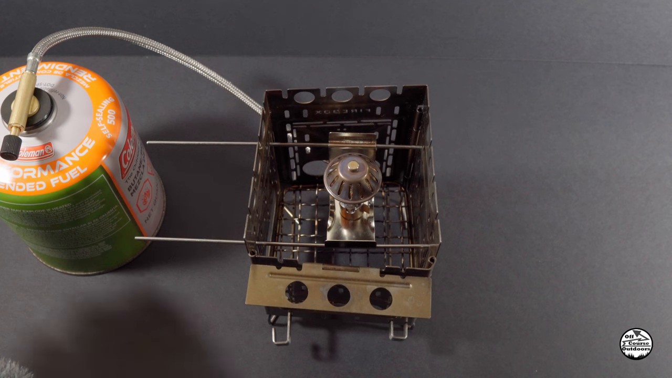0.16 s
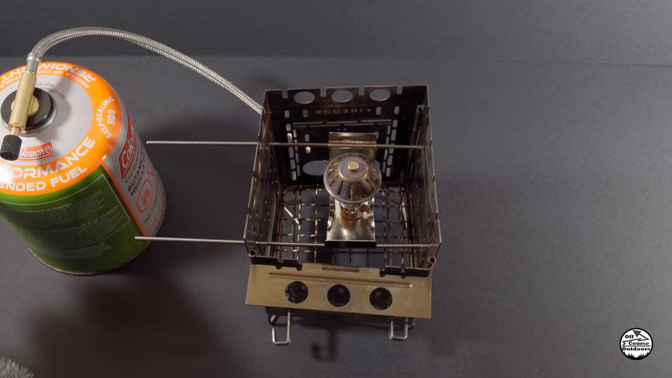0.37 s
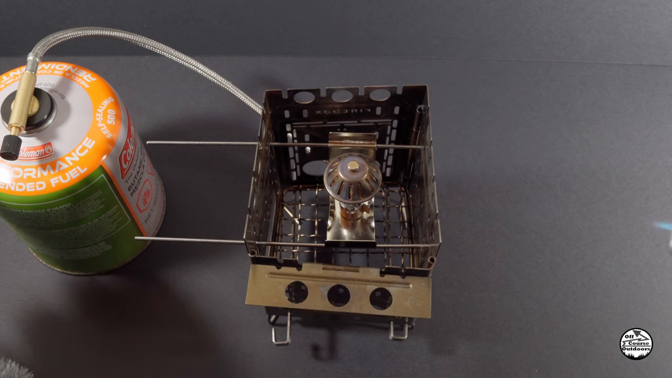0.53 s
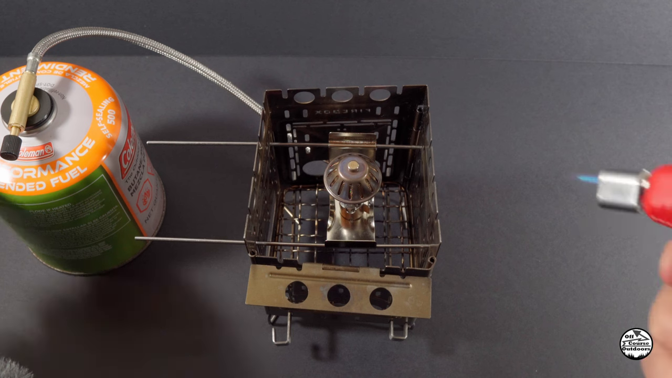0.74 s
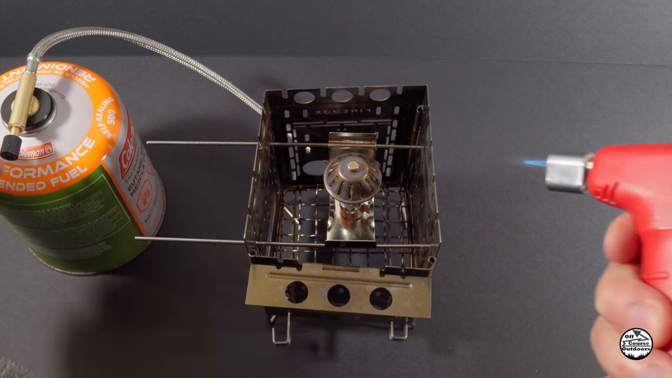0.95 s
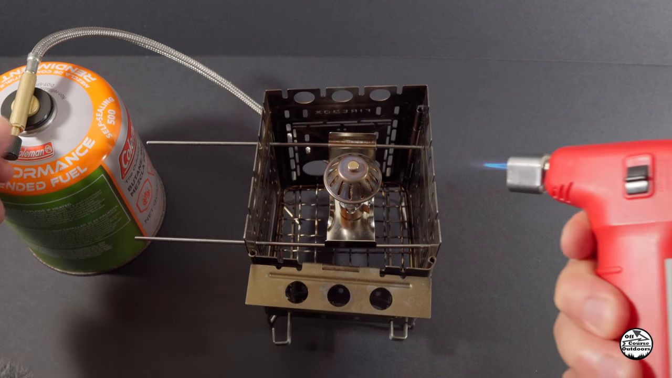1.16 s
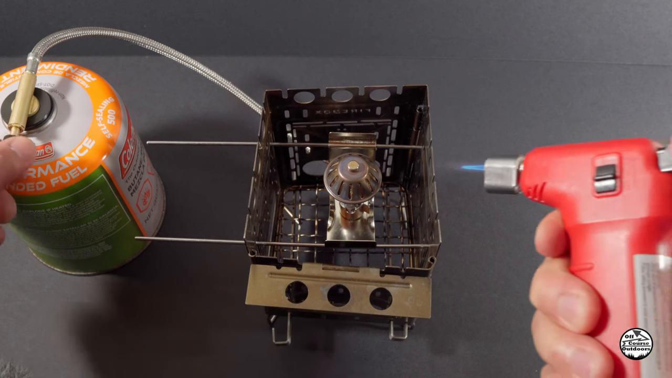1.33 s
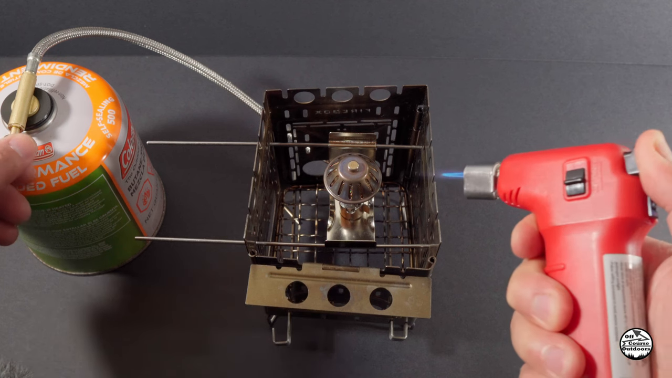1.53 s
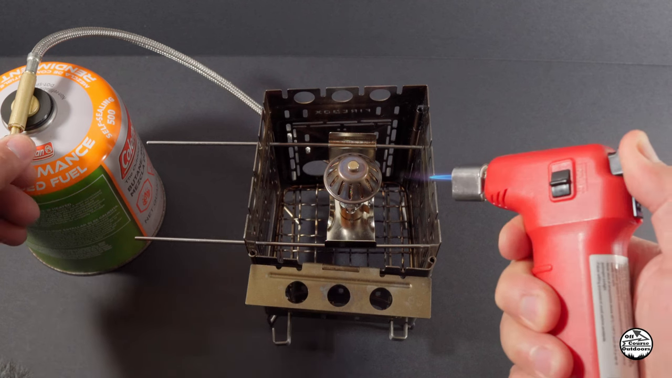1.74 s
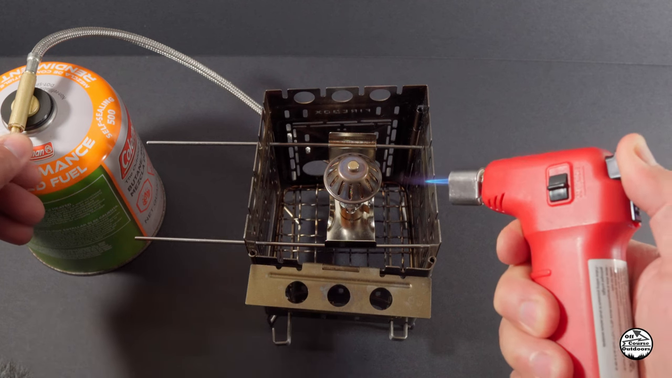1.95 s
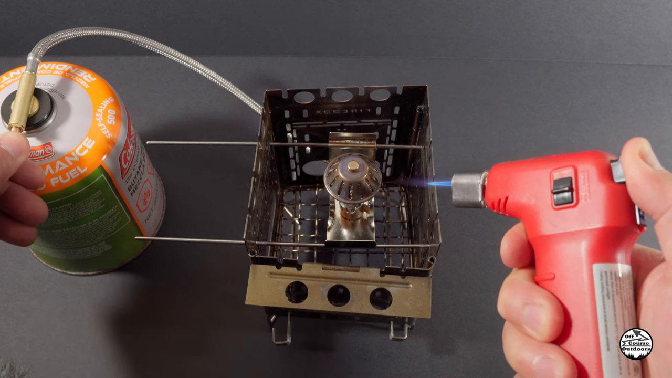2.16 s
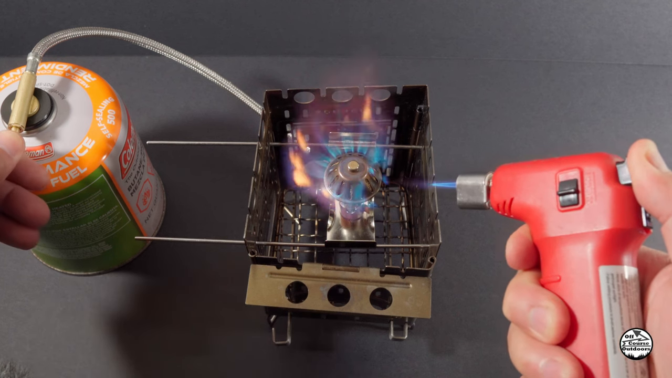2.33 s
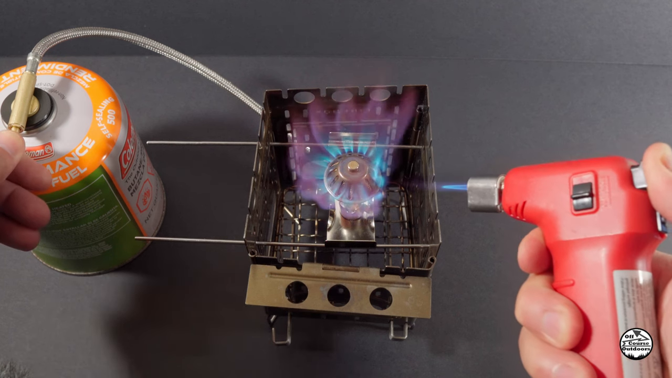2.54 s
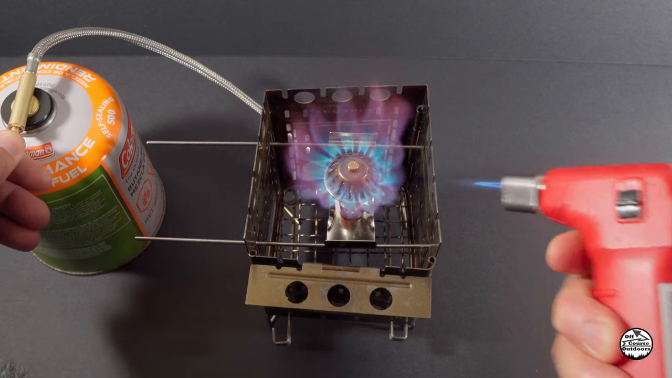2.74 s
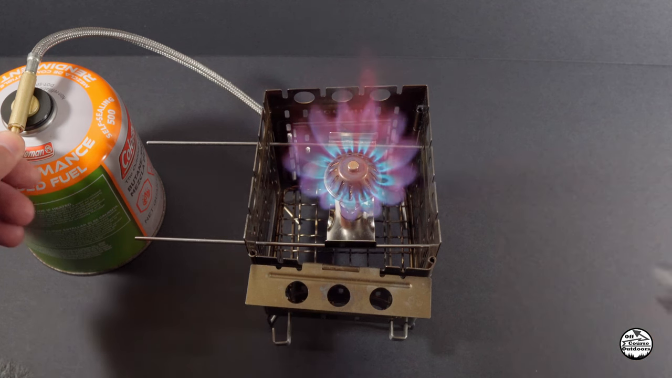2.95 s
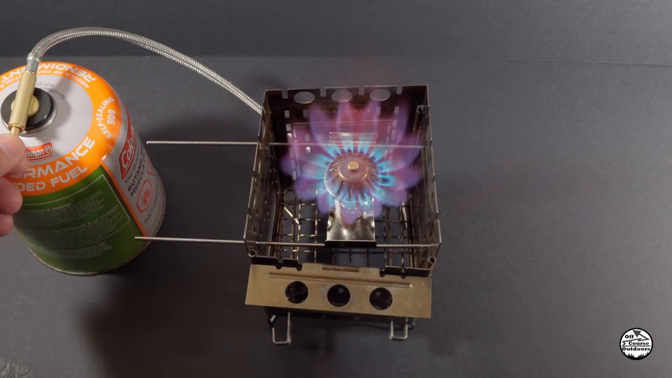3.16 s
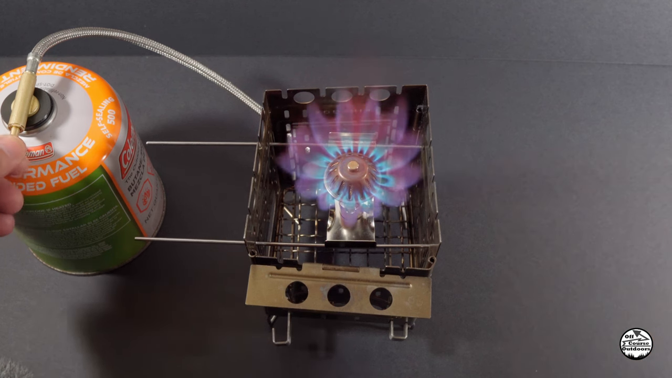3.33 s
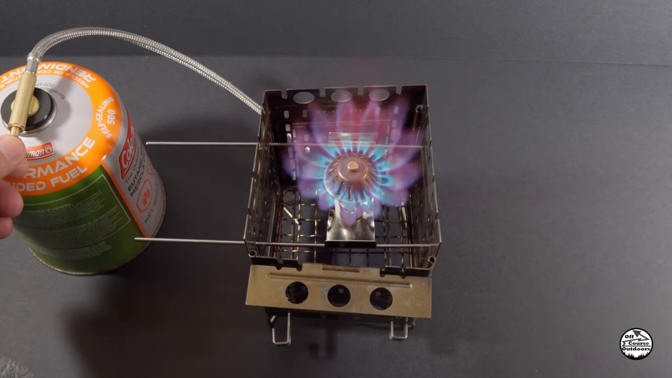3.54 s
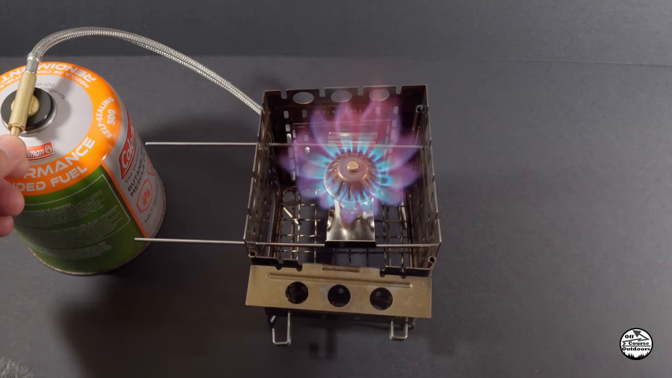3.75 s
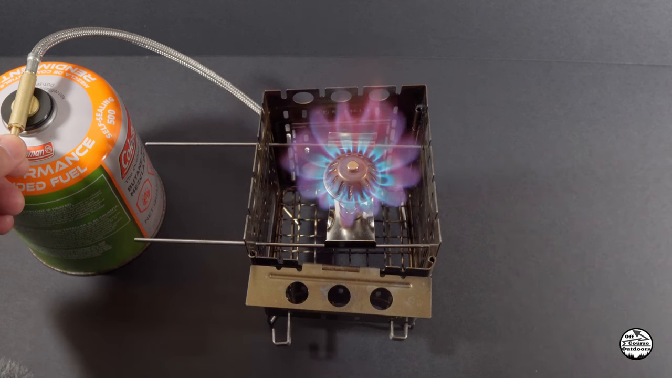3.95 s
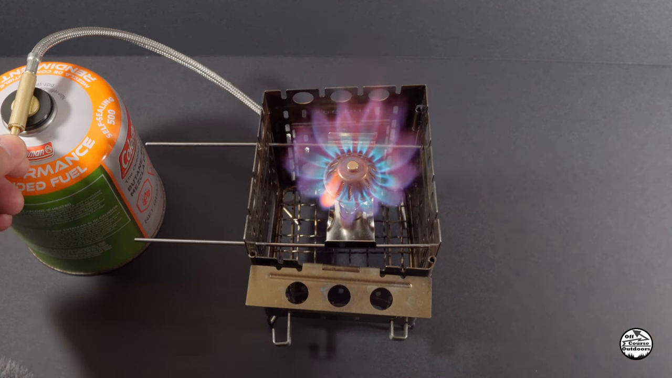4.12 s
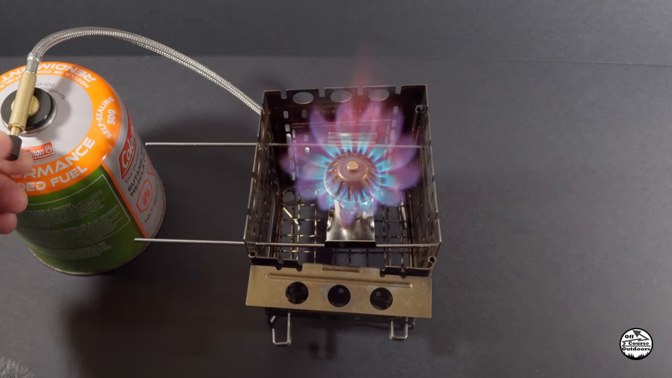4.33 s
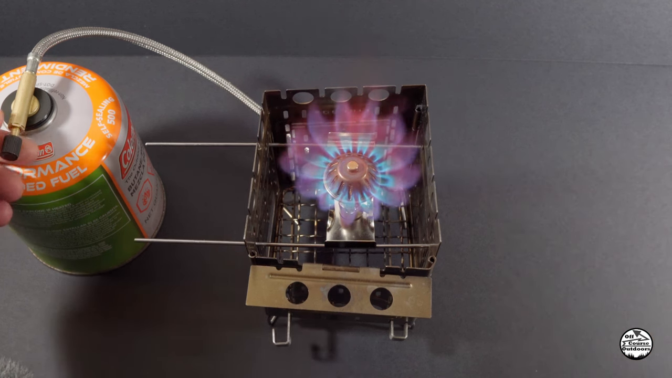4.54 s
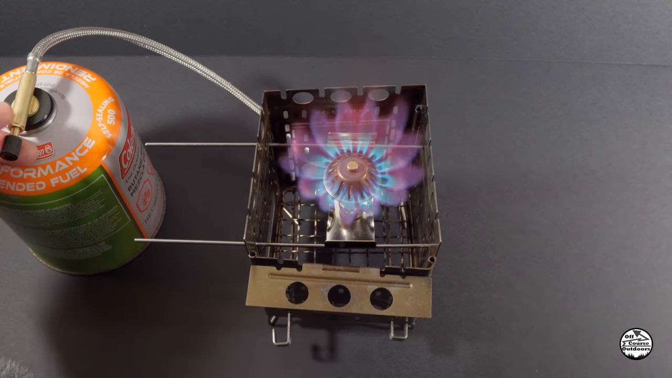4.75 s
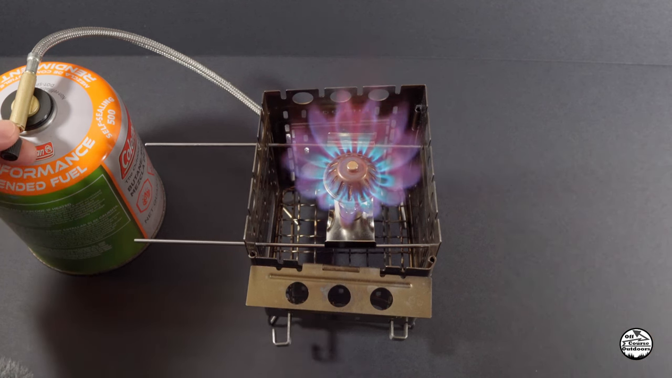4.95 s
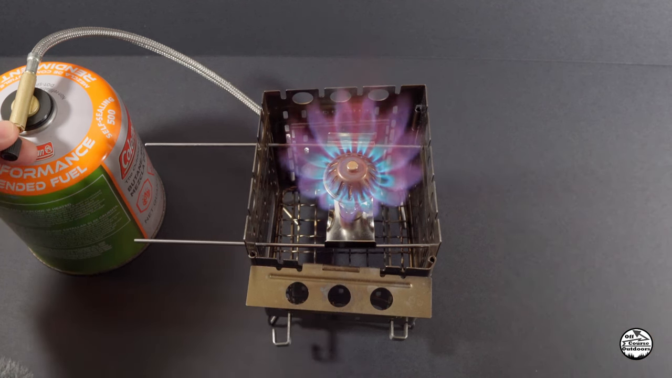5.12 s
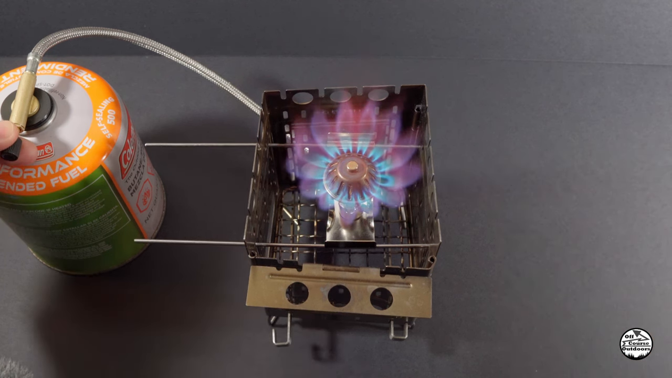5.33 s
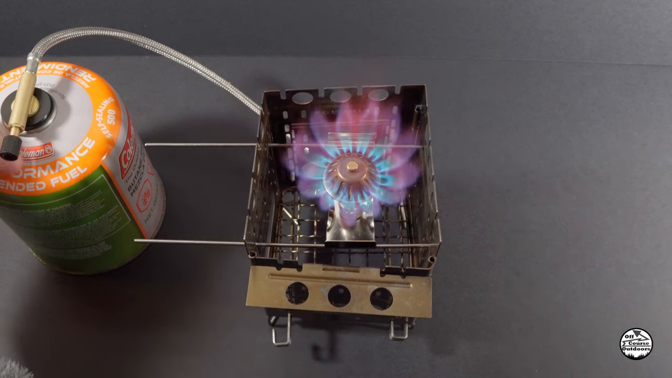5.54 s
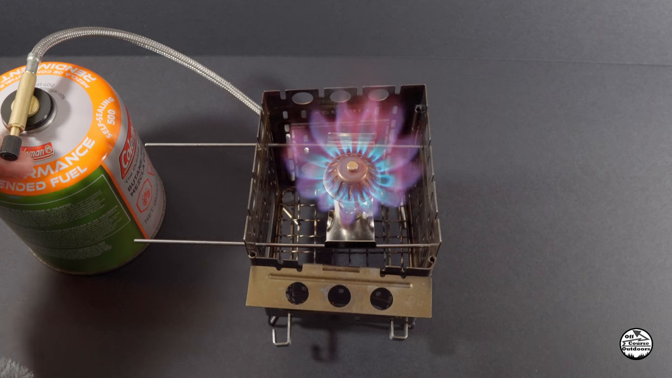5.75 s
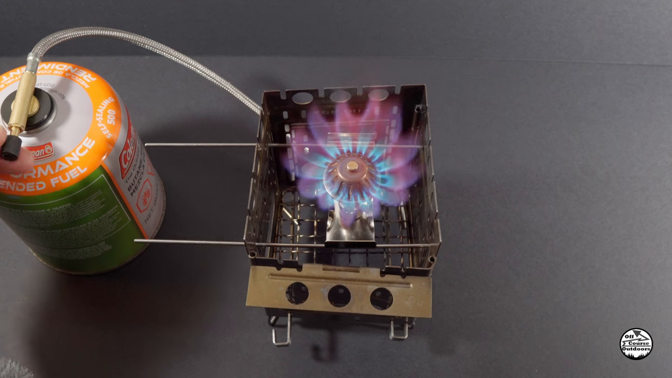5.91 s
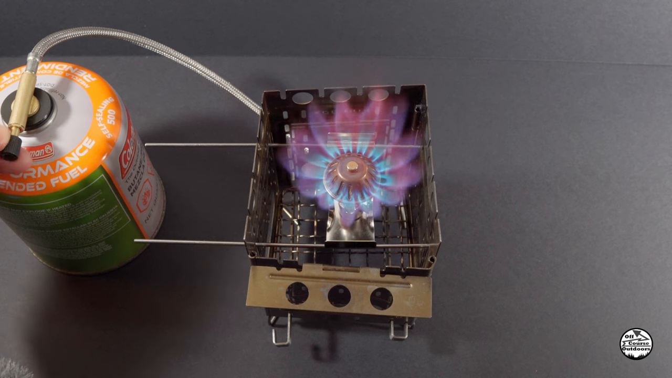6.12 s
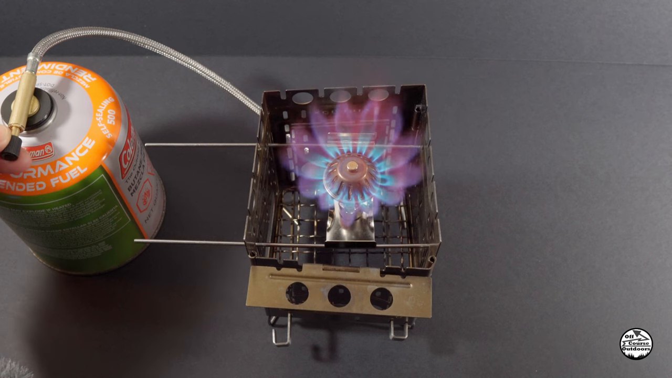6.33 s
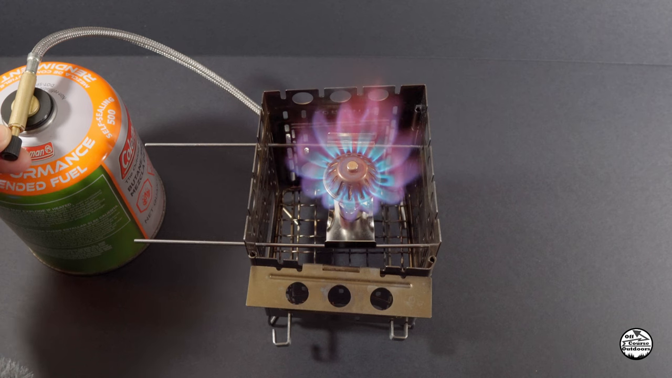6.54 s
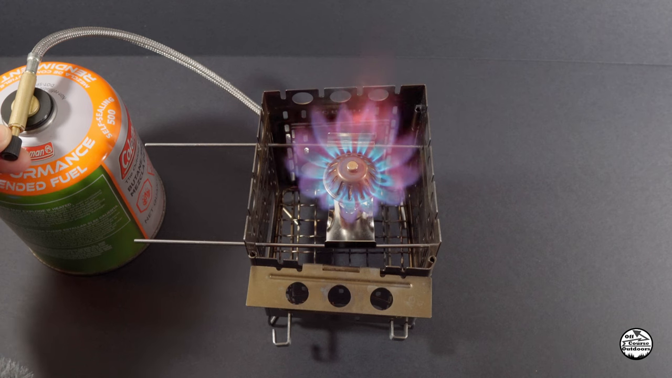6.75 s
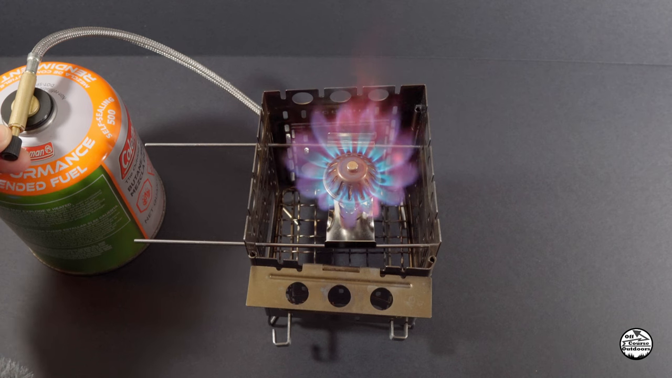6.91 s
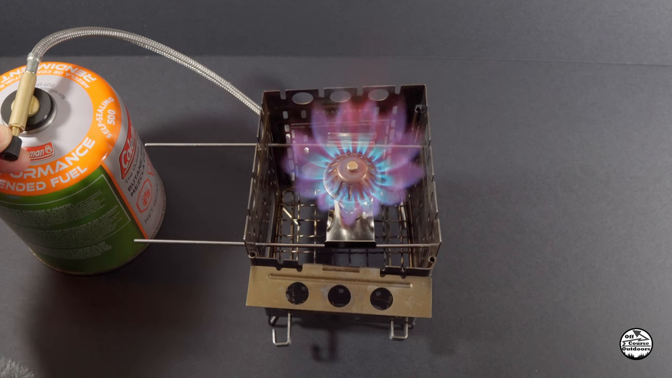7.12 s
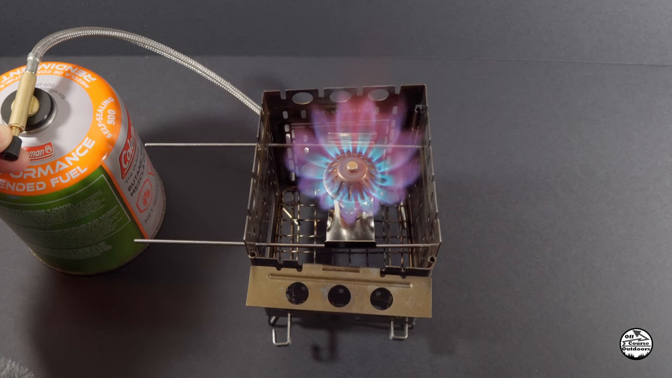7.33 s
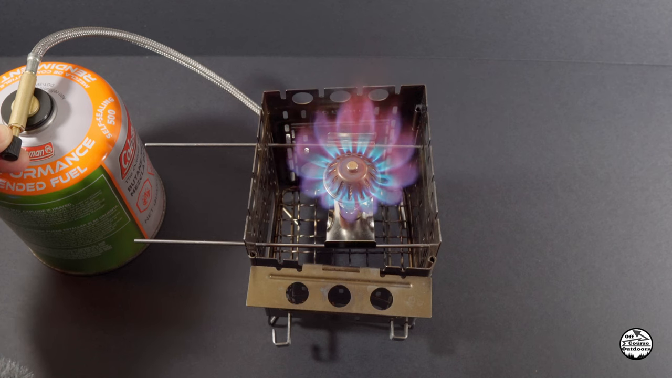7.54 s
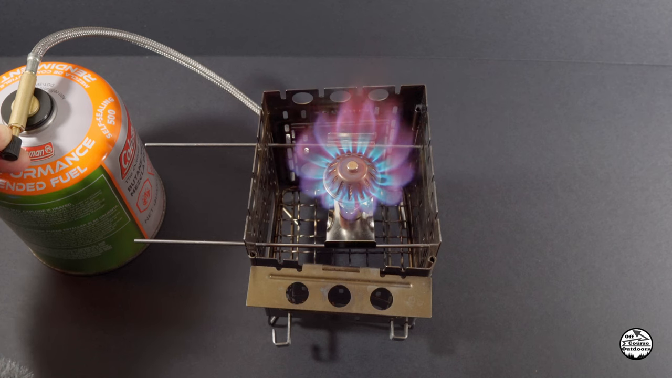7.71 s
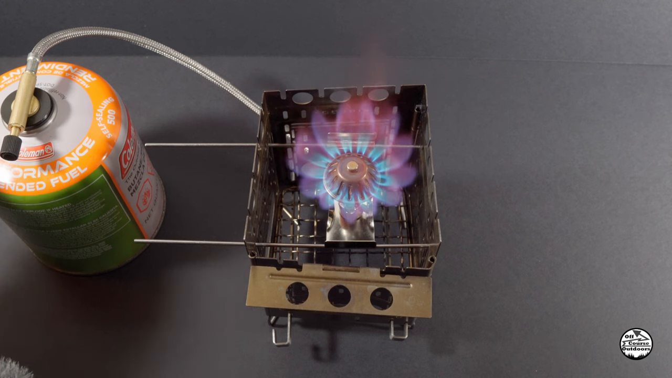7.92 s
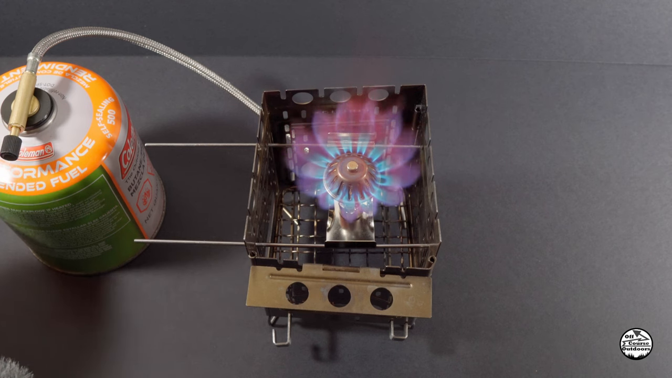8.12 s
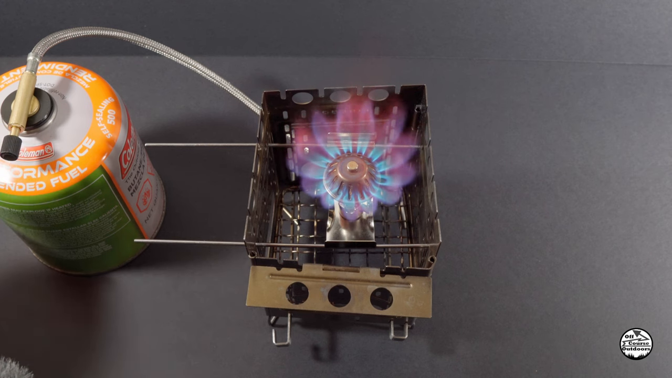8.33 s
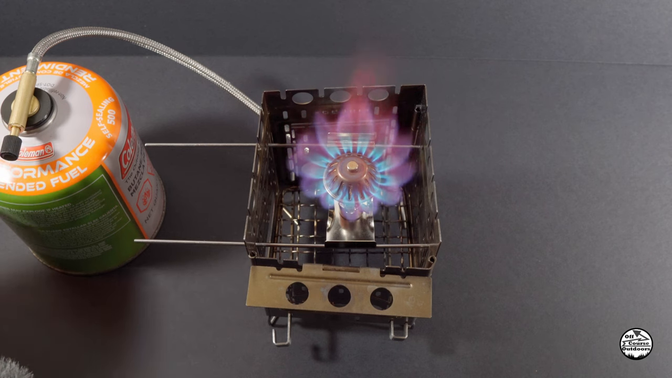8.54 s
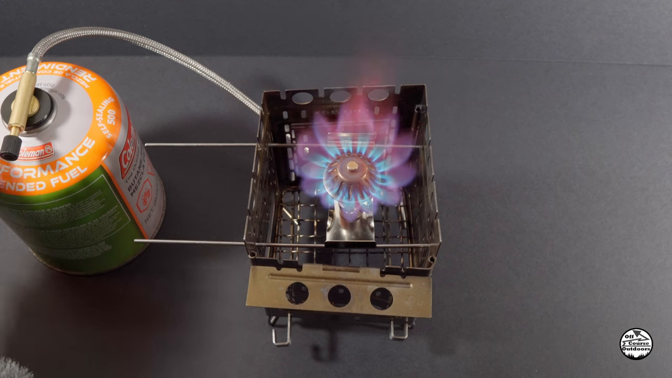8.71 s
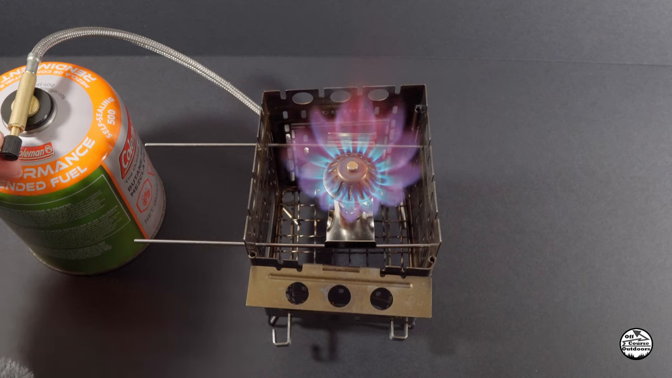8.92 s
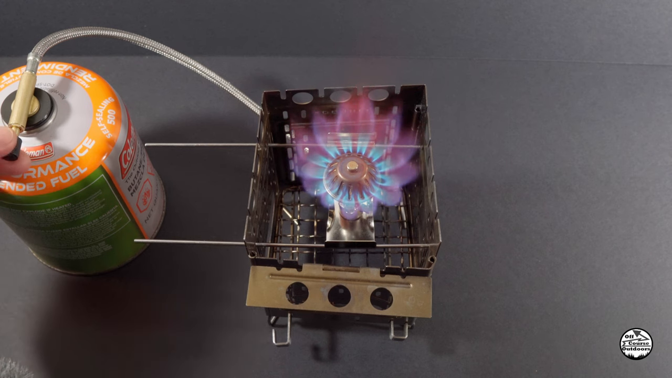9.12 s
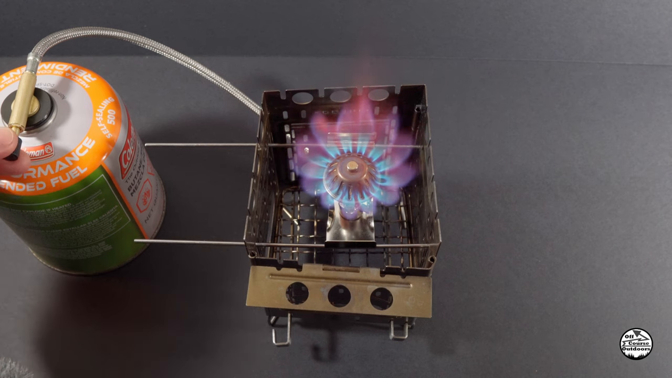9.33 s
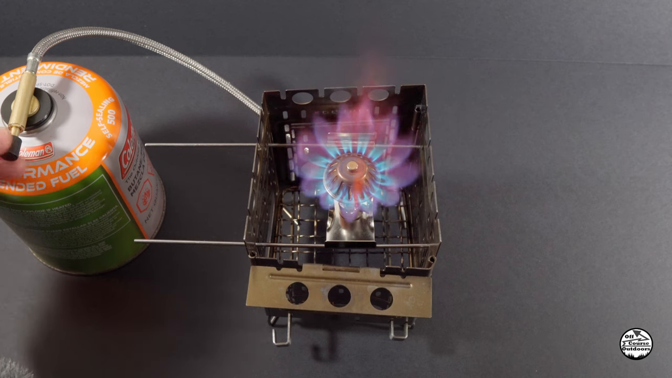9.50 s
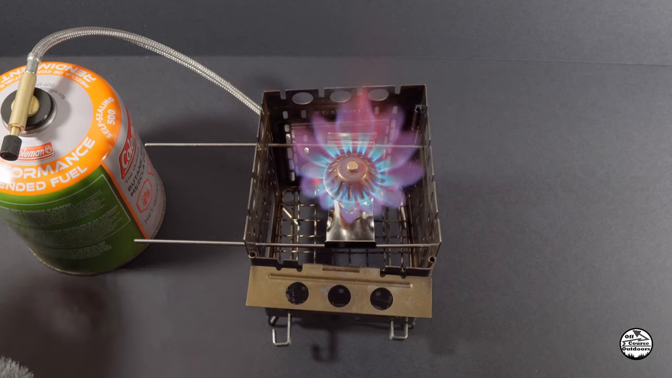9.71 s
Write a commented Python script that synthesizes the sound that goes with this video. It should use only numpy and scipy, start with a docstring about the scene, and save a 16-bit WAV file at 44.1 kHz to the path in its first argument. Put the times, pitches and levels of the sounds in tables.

```python
"""Gas burner lit with a jet lighter

The lighter's trigger creaks, its piezo snaps and its thin jet comes closer. The gas catches with a soft
thump, hiss and whistle rise with the valve, and the trigger clacks back; the flame roars on.
Roar, hiss, jet and air are coloured noise; the whistle is resonated noise; clicks are short noise bursts
through shell and trigger resonances, with ringing modes and room echoes; hand bumps are damped sines."""
import sys
import numpy as np
from scipy import signal
from scipy.fft import rfft, irfft, next_fast_len
from scipy.io import wavfile
from scipy.ndimage import uniform_filter1d

SR = 44100
rng = np.random.default_rng(int(sys.argv[2]) if len(sys.argv) > 2 else 0)


def transcribe(signal):
    """Save signal, clipped to [-1, 1], as a 16-bit WAV file at the path in sys.argv[1]."""
    frames = np.atleast_2d(signal).T
    limited = np.clip(frames, -1, 1)
    pcm = np.round(limited * 32767).astype(np.int16)
    wavfile.write(sys.argv[1], SR, pcm)


N = 430857
TIME_S = np.arange(N) / SR

# Flame roar, relative spectral density: freq_hz, density_db
ROAR_SPECTRUM = [(30, -32), (60, -25.5), (85, -10.5), (125, -1.5), (210, -2.5), (340, -2.5), (460, -10.5),
                 (600, -12.5), (970, -14.5), (1200, -28), (2000, -29), (4000, -47)]
# Peaks and hollows of table top and windscreen: freq_hz, width_hz, gain_db
ROAR_PEAKS = [(143, 23, 3), (162.3, 24, -3), (207, 43, 3), (270, 59, -1), (327.7, 31, 3), (455, 26, -6),
              (584, 67, 2.5)]
# Flame surges: centre_s, change_db, width_s
SURGES = [(2.42, 6, 0.072), (2.635, 7.5, 0.06), (3.15, 1, .25), (4.7, 2, 0.33), (7.33, 1, 0.29),
          (9.1, 0.9, 0.44)]
# Catching thump before its low-pass, relative spectral density: freq_hz, density_db
THUMP_SPECTRUM = [(25, -23), (70, 4), (130, 0), (330, 5), (480, -4), (950, -7.5), (1400, -33), (4000, -50)]
# Gas hiss, relative spectral density: freq_hz, density_db
HISS_SPECTRUM = [(300, -15), (1200, -3.5), (1600, 2), (2200, -0.5), (2800, 0.5), (3800, 1), (4800, 1),
                 (5600, -4), (6500, -1.5), (8800, 0.5), (9600, -12), (10500, -17.5), (13000, -19),
                 (15500, -18.5)]
# Peaks and hollows of the mixing tube: freq_hz, width_hz, gain_db
HISS_PEAKS = [(2780, 370, 2.5), (3350, 136, -7.5), (5650, 230, -3), (5980, 220, 2), (7000, 500, 5),
              (7950, 250, -3), (8330, 490, 3), (10000, 400, 3), (10500, 400, 0.5), (11130, 400, 7.5),
              (11630, 370, 15), (12350, 500, 2), (13150, 550, -2)]
# Edge tone in the mixing tube, relative levels, width of one resonator pass: freq_hz, width_hz, level_db
WHISTLE_TONES = [(4207, 158, 2.5), (4346, 207, 2.5)]
# Whistle falters: centre_s, change_db, width_s
FALTERS = [(4.55, -3.5, .35), (5.3, -2.5, .3), (9.3, -1.4, 0.28)]
# Lighter jet facing the burner, relative spectral density: freq_hz, density_db
JET_SPECTRUM = [(30, -35), (70, -27), (140, -12), (260, -11), (340, -4), (600, -7.5), (1000, -6), (1650, 1),
                (2600, -5), (4300, -7), (6000, -12.5), (8500, -17.5), (11500, -33), (15500, -41)]
# Its peaks and hollows: freq_hz, width_hz, gain_db
JET_PEAKS = [(464, 150, -7.5), (1190, 210, -11.5), (2740, 290, 2), (3090, 480, -10), (4870, 250, -2.5),
             (5650, 250, -1.5), (6650, 350, -6), (7250, 300, -3.5), (7900, 410, 3), (9200, 230, -4.5)]
# Extra colour while the jet is off to the side: freq_hz, gain_db
ASIDE_SPECTRUM = [(100, 7.5), (350, 6), (900, -0.5), (1600, 1), (2700, -8.5), (6000, -4), (9500, -12.5),
                  (15000, -11.5)]
# Its peaks and hollows: freq_hz, width_hz, gain_db
ASIDE_PEAKS = [(4650, 450, -8.5), (5350, 800, 6.5), (6650, 400, -8.5), (7720, 450, 8.5)]
# Piezo hammer, rebound, two ticks, trigger release, relative levels:
# start_s, level_db, t60_s, bass_db, housing_share (0-1)
CLICKS = [(0.5093, 0, 0.0078, -22, .95), (0.5136, -2.5, 0.016, -1.5, 0.94), (1.154, -35, 0.0076, -12, 0.1),
          (2.621, -21.5, 0.0092, -20, 0.1), (2.8388, 3, 0.0097, -6.5, 0.18)]
# Trigger creaks under the thumb, levels on the click scale: start_s, level_db
CREAKS = [(.093, -71), (.14, -67), (0.2423, -46.5), (.298, -68), (.3315, -56), (.349, -64), (.445, -64),
          (.464, -66.5)]
# Broad click colour: freq_hz, gain_db
CLICK_COLOUR = [(40, -34.5), (250, -13.5), (850, -17.5), (1300, -6), (3000, -7.5), (6000, -3.5), (8400, -7),
                (11000, -18), (14000, -19.5), (16000, -30)]
# Plastic shell resonances: freq_hz, width_hz, gain_db
SHELL_PEAKS = [(1150, 320, -0.5), (1710, 160, 14), (2370, 660, -8.5), (3320, 390, 11.5), (4000, 360, -3),
               (5200, 560, 10), (6800, 470, 3), (9300, 510, -10)]
# Trigger resonances: freq_hz, width_hz, gain_db
TRIGGER_PEAKS = [(650, 730, -8), (1310, 550, 8.5), (2300, 530, 2.5), (5150, 1400, 1.5), (9100, 700, 8)]
# Modes of housing and spring, relative levels: pitch_hz, level_db, t60_s
HOUSING_MODES = [(1640, -2, .22), (1680, 2, 0.266), (1810, -5, .38), (1780, -2, 0.38), (1960, -6, .22),
                 (3120, -4, .15), (3280, 3, .2), (3400, -4, .16), (4200, -13, .17), (4662, -10, .25),
                 (5240, -4.5, .19), (6900, -5, .14), (9350, 9, .09)]
# Dull bumps of hands on lighter and canister: start_s, level_db, pitch_hz, t60_s
BUMPS = [(0.519, -47, 133, .12), (.62, -61, 112, 0.44), (1.025, -61, 85, .18), (1.39, -59, 115, .15),
         (1.495, -58, 88, .22)]
# Room reverberation: freq_hz, t60_s
ROOM_T60 = [(150, 0.51), (1500, 0.27), (5000, 0.26), (9000, 0.2), (15000, 0.19)]
# Quiet room air, relative spectral density: freq_hz, density_db
AIR_SPECTRUM = [(30, -21), (60, -7), (120, 1.5), (300, 0), (1200, -2), (2800, -11), (4500, -12),
                (9000, -19), (15000, -35)]

# Flame: ROAR_DB at full flow and spread, SMALL_FLAME_DB added at ignition
CATCH_S, SPREAD_S = 2.304, 0.86
ROAR_DB, SMALL_FLAME_DB = -33, -8.5
ROAR_DB_PER_SAG_DB = 1.54
FLARE_DB, FLARE_ATTACK_S, FLARE_HOLD_S, FLARE_T60_S = -23.5, 0.014, 0.013, 0.075
# Gas: levels at full flow; the flow sags as the canister cools
VALVE_OPEN_S, VALVE_TIME_CONSTANT_S = 2.37, 0.35
HISS_DB, WHISTLE_DB = -39, -34
WHISTLE_DB_PER_SAG_DB = 1.54
SAG_FROM_S, SAG_DB_PER_S = 4.68, 0.4058
# Lighter: leaks, lights, dies; jet level at NEAR_M, unlit leak relative to the lit jet
LEAK_S, SPARK_S, LET_GO_S, JET_SWITCH_S = 0.455, 0.509, 2.83, 0.033
JET_DB, LEAK_DB = -42.5, -8
# The hand brings the lighter to the burner and turns it on the way
FAR_M, NEAR_M, MOVE_MID_S, MOVE_EASE_S = 0.83, 0.15, 0.76, 0.2
TURN_MID_S, TURN_EASE_S = 0.99, 0.12
CREAK_T60_S, CREAK_BASS_DB = 0.018, 18


def flame(puff_db=0.81, puff_rate_hz=10, flutter_db=1.9, flutter_rate_hz=130,
          catch_s=0.011, bright_db=1.0, bright_hz=480):
    """Turbulent burning: a low roar that swells and brightens with each tongue and flutters with eddies."""
    spread_db = SMALL_FLAME_DB * (1 - ramp(CATCH_S, SPREAD_S))
    level_db = ROAR_DB + spread_db + ROAR_DB_PER_SAG_DB * sag_db() + swells(SURGES)
    tongues = drift(puff_rate_hz)
    strength_db = puff_db * tongues + flutter_db * drift(flutter_rate_hz)
    eddies = rng.standard_normal(N) * from_db(strength_db)
    high_pass = signal.butter(2, bright_hz, "high", fs=SR, output="sos")
    small_eddies = signal.sosfiltfilt(high_pass, eddies)
    eddies = eddies + (from_db(bright_db * tongues) - 1) * small_eddies
    roar = rms_one(colour(eddies, ROAR_SPECTRUM, ROAR_PEAKS))
    return ramp(CATCH_S, catch_s) * from_db(level_db) * roar


def flare(top_hz=330, steady_s=0.016):
    """The gathered gas expands at once as it catches: a short thump, deeper than the roar."""
    low_pass = signal.butter(1, top_hz, fs=SR, output="sos")
    puff = signal.sosfilt(low_pass, noise(THUMP_SPECTRUM))
    # even out the short-term power
    puff = puff / np.sqrt(uniform_filter1d(puff ** 2, int(steady_s * SR)) + 1e-12)
    decay_age_s = np.maximum(TIME_S - CATCH_S - FLARE_ATTACK_S - FLARE_HOLD_S, 0)
    envelope = ramp(CATCH_S, FLARE_ATTACK_S) * np.exp(-np.log(1000) * decay_age_s / FLARE_T60_S)
    return from_db(FLARE_DB) * envelope * puff


def gas_jet(flutter_db=1.0, waver_db=0.74):
    """Gas hisses from the nozzle and drives a breathy whistle in the mixing tube; both follow the flow."""
    valve = 1 - np.exp(-np.maximum(TIME_S - VALVE_OPEN_S, 0) / VALVE_TIME_CONSTANT_S)
    hiss_db = HISS_DB + sag_db() + flutter_db * drift(28)
    hiss = from_db(hiss_db) * noise(HISS_SPECTRUM, HISS_PEAKS)
    whistle = 0
    for hz, width_hz, level_db in WHISTLE_TONES:
        tone = resonate(rng.standard_normal(N), hz, width_hz)
        tone = resonate(tone, hz, width_hz)
        whistle = whistle + from_db(level_db) * rms_one(tone)
    whistle_db = WHISTLE_DB + WHISTLE_DB_PER_SAG_DB * sag_db() + swells(FALTERS) + waver_db * drift(16)
    return valve * (hiss + from_db(whistle_db) * rms_one(whistle))


def lighter_jet(flutter_db=0.17):
    """A small jet, louder as it nears; hollow and dull from the side, brighter as it faces the burner."""
    distance_m = FAR_M + (NEAR_M - FAR_M) * ease(MOVE_MID_S, MOVE_EASE_S)
    facing = ease(TURN_MID_S, TURN_EASE_S)
    leak = from_db(LEAK_DB) * ramp(LEAK_S, JET_SWITCH_S)
    lit = ramp(SPARK_S, JET_SWITCH_S)
    running = np.maximum(leak, lit) * (1 - ramp(LET_GO_S, JET_SWITCH_S))
    jet = noise(JET_SPECTRUM, JET_PEAKS)
    aside = colour(jet, ASIDE_SPECTRUM, ASIDE_PEAKS)
    level = running * NEAR_M / distance_m * from_db(JET_DB + flutter_db * drift(16))
    return level * (facing * jet + (1 - facing) * aside)


def lighter_clicks(crack_db=3.0, ring_db=-32, bass_hz=2300, strike_gain=3.2):
    """Contacts are a sharp strike and decaying chatter; the housing's share also sets its modes ringing."""
    in_shell, in_trigger, blows = np.zeros((3, N))
    age_s = np.arange(SR // 10) / SR
    low_pass = signal.butter(1, bass_hz, fs=SR, output="sos")
    creaks = [(s, db, CREAK_T60_S, CREAK_BASS_DB, 0) for s, db in CREAKS]
    for start_s, level_db, t60_s, bass_db, share in creaks + CLICKS:
        at, share = round(start_s * SR), np.clip(share, 0, 1)
        burst = rng.choice([-1, 1], len(age_s)) * from_db(level_db - 60 * age_s / t60_s)
        burst[0] *= strike_gain
        bass = signal.sosfilt(low_pass, burst)
        burst = burst + (from_db(bass_db) - 1) * bass  # soft contacts are richer in bass
        in_shell[at:at + len(age_s)] += share * burst
        in_trigger[at:at + len(age_s)] += (1 - share) * burst
        blows[at] = share * from_db(level_db + bass_db)
    crack = colour(in_shell, CLICK_COLOUR, SHELL_PEAKS) + colour(in_trigger, CLICK_COLOUR, TRIGGER_PEAKS)
    housing = 0
    for k, (hz, level_db, t60_s) in enumerate(HOUSING_MODES):
        housing = housing + (-1) ** k * from_db(level_db) * ring(blows, hz, t60_s)  # alternating polarity
    return from_db(crack_db) * crack + from_db(ring_db) * housing


def bumps():
    """Soft knocks, each one low damped swing."""
    knocks = 0
    for start_s, level_db, hz, t60_s in BUMPS:
        impulse = np.zeros(N)
        impulse[round(start_s * SR)] = 1
        knocks = knocks + from_db(level_db) * ring(impulse, hz, t60_s)
    return knocks


def room(x, early_db=6, early_t60_s=0.067, wall_delay_s=0.007):
    """Diffuse echoes: each band's energy lingers as noise, strong early reflections over a longer tail."""
    age_s, echoes = np.arange(SR // 2) / SR, 0
    edges_hz = np.geomspace(150, 17000, 13)
    for low_hz, high_hz in zip(edges_hz, edges_hz[1:]):
        band = signal.butter(3, [low_hz, high_hz], "band", fs=SR, output="sos")
        tail = from_db(-60 * age_s / at_hz(ROOM_T60, np.sqrt(low_hz * high_hz)))
        early = from_db(early_db - 60 * age_s / early_t60_s)
        decay = (tail ** 2 + early ** 2) * (age_s > wall_delay_s)
        energy = signal.oaconvolve(signal.sosfilt(band, x) ** 2, decay / decay.sum())[:N]
        carrier = rms_one(signal.sosfilt(band, rng.standard_normal(N)))
        echoes = echoes + np.sqrt(np.maximum(energy, 0)) * carrier
    return echoes


def room_air(level_db=-70.5):
    """Faint steady noise of the quiet room."""
    return from_db(level_db) * noise(AIR_SPECTRUM)


def sag_db():
    """Loss of gas flow as the canister cools."""
    return -SAG_DB_PER_S * np.maximum(TIME_S - SAG_FROM_S, 0)


def swells(rows):
    """Bell-shaped rises or dips in dB, width at half height."""
    return sum(db * bell(TIME_S, centre_s, width_s) for centre_s, db, width_s in rows)


def bell(x, centre, width):
    """Gaussian of height 1, width at half height."""
    return 0.5 ** ((2 * (x - centre) / width) ** 2)


def ramp(start_s, length_s):
    """Straight rise from 0 to 1."""
    return np.clip((TIME_S - start_s) / length_s, 0, 1)


def ease(middle_s, width_s):
    """Smooth move from 0 to 1."""
    return 0.5 + 0.5 * np.tanh((TIME_S - middle_s) / (2 * width_s))


def drift(rate_hz):
    """Smooth random wander, about rate_hz changes a second, unit RMS."""
    size = next_fast_len(N)
    hz = np.fft.rfftfreq(size, 1 / SR)
    spectrum = rfft(rng.standard_normal(size)) / (1 + (hz / rate_hz) ** 2)
    return rms_one(irfft(spectrum, size)[:N])


def noise(spectrum, peaks=()):
    """Coloured turbulence of unit power."""
    return rms_one(colour(rng.standard_normal(N), spectrum, peaks))


def colour(x, spectrum, peaks=()):
    """Minimum-phase filter: a broad spectrum with bell-shaped peaks and hollows."""
    size = 2 * next_fast_len(N // 2 + SR // 10)
    hz = np.maximum(np.fft.rfftfreq(size, 1 / SR), 1)
    gain_db = at_hz(spectrum, hz) + sum(db * bell(hz, f, width_hz) for f, width_hz, db in peaks)
    cepstrum = irfft(np.log(from_db(gain_db)))
    cepstrum[1:size // 2] *= 2  # fold to causal
    response = np.exp(rfft(cepstrum[:size // 2], size))
    return irfft(rfft(x, size) * response)[:N]


def resonate(x, hz, width_hz):
    """Two-pole resonance with gain 1 on top."""
    r = np.exp(-np.pi * width_hz / SR)
    feedback = [1, -2 * r * np.cos(2 * np.pi * hz / SR), r * r]
    return signal.lfilter(np.array([1, 0, -1]) * (1 - r * r) / 2, feedback, x)


def ring(x, hz, t60_s):
    """A unit click starts a decaying sine of initial height 1."""
    r, w = from_db(-60 / (t60_s * SR)), 2 * np.pi * hz / SR
    return signal.lfilter([0, np.sin(w)], [1, -2 * r * np.cos(w), r * r], x + 1e-18)


def at_hz(points, hz):
    """Interpolate a table on a log-frequency axis."""
    f, value = np.transpose(points)
    return np.interp(np.log(hz), np.log(f), value)


def from_db(db):
    """Decibels to gain."""
    return 10 ** (np.asarray(db) / 20)


def rms_one(x):
    """Scale to unit power."""
    return x / np.sqrt(np.mean(x ** 2) + 1e-20)


def scene(room_db=-13):
    """Burner, lighter and quiet room, the same in both channels; only the clicks get room echoes."""
    clicks = lighter_clicks()
    burner = flame() + flare() + gas_jet()
    lighter = lighter_jet() + clicks + from_db(room_db) * room(clicks)
    mono = burner + lighter + bumps() + room_air()
    return np.array([mono, mono])


def record(dry, low_cut_hz=45, high_cut_hz=15700):
    """Peaks beyond full scale clip; the deep bass and the top are cut."""
    low_cut = signal.butter(2, low_cut_hz, "high", fs=SR, output="sos")
    high_cut = signal.ellip(10, 0.1, 80, high_cut_hz, fs=SR, output="sos")
    limited = signal.sosfilt(low_cut, np.clip(dry, -1, 1))
    return signal.sosfilt(high_cut, limited)


dry = scene()
out = record(dry)
transcribe(out)
```